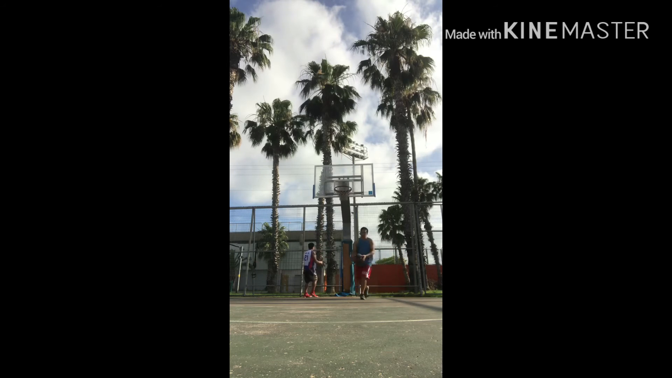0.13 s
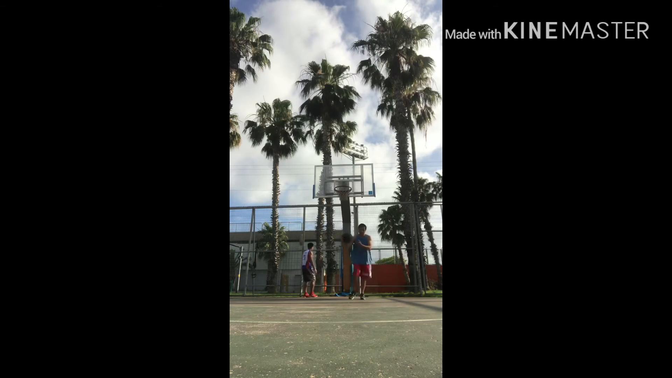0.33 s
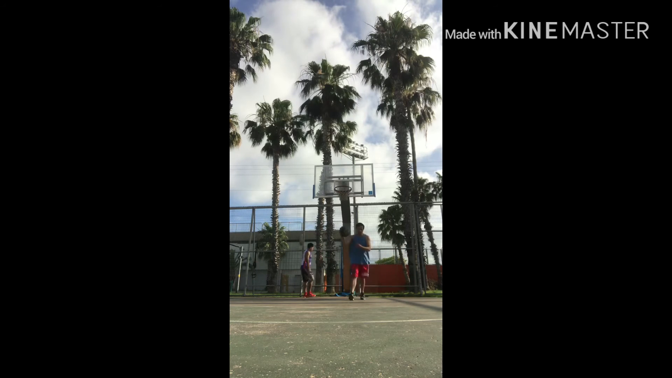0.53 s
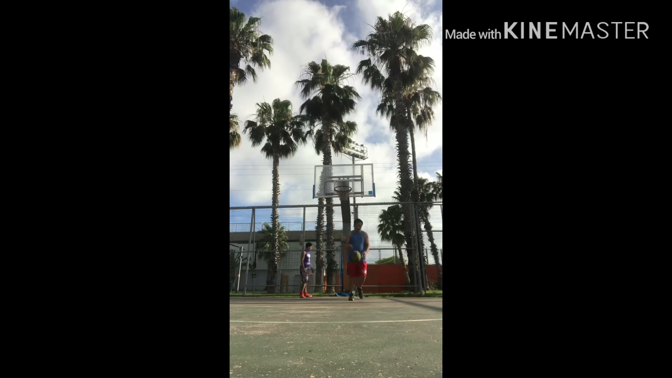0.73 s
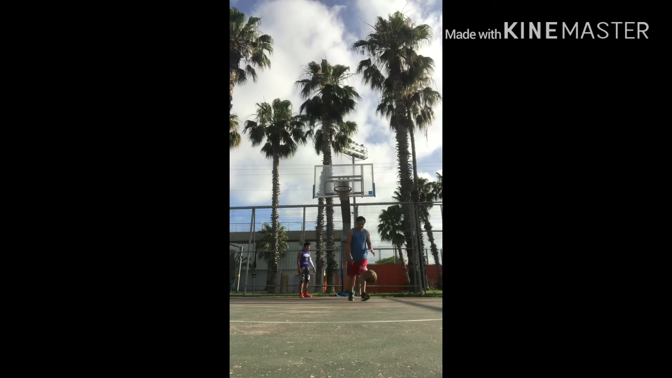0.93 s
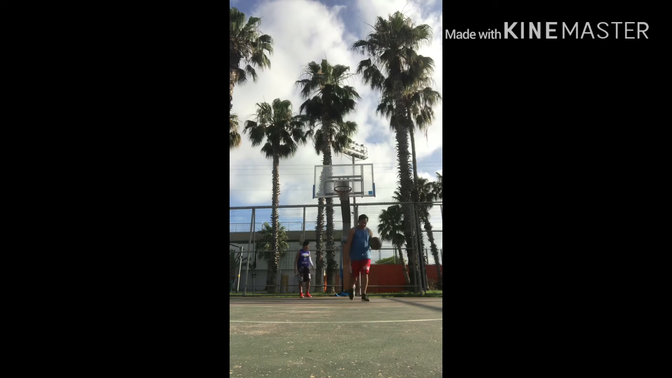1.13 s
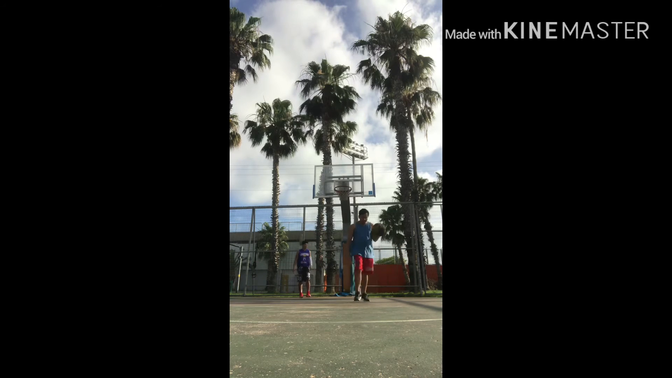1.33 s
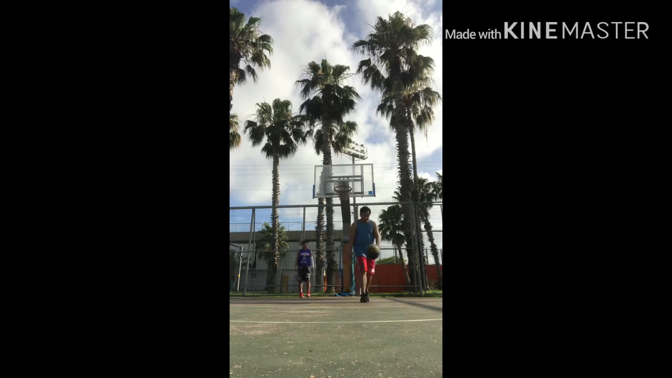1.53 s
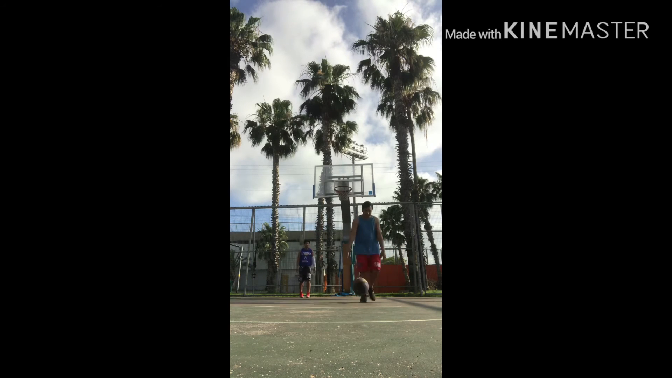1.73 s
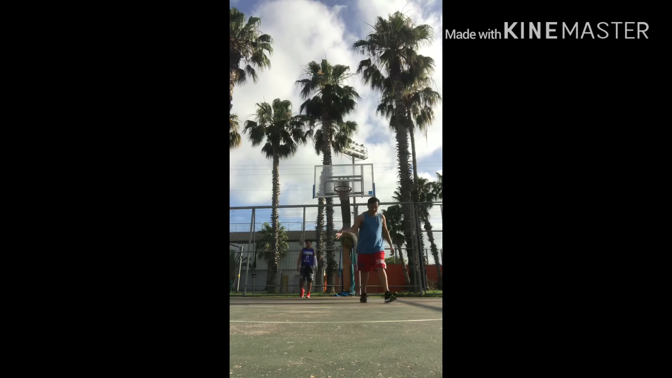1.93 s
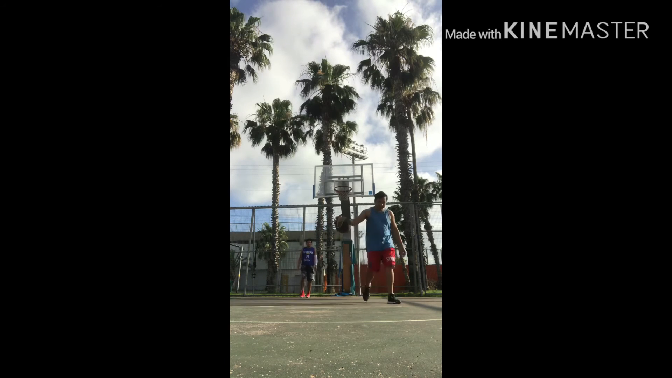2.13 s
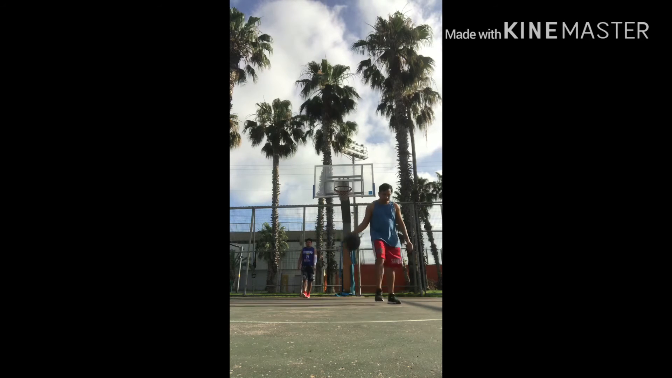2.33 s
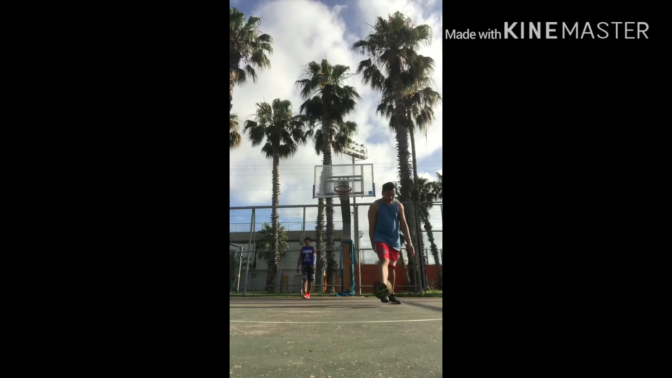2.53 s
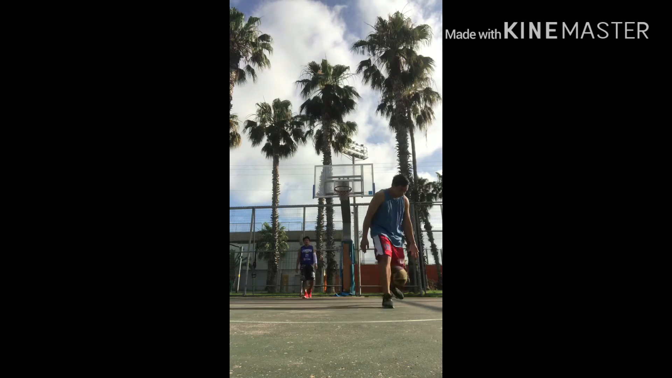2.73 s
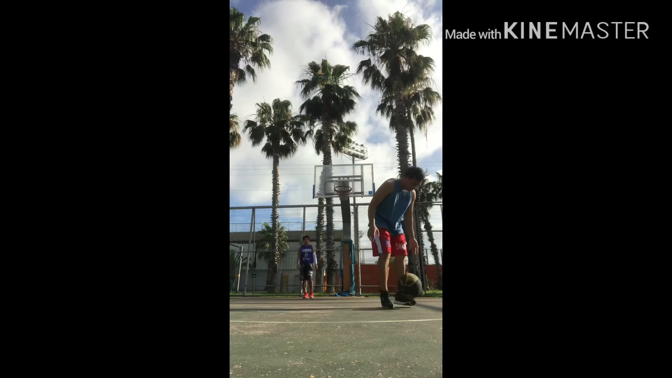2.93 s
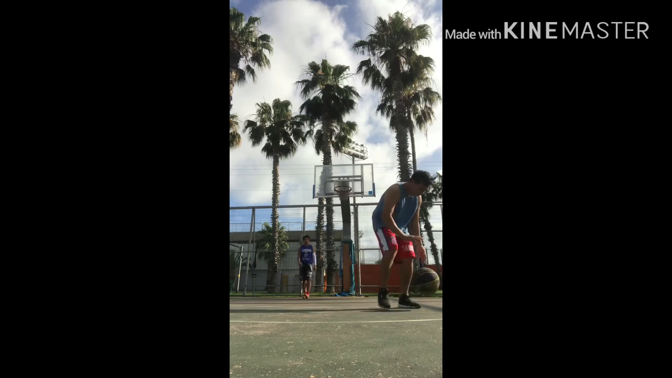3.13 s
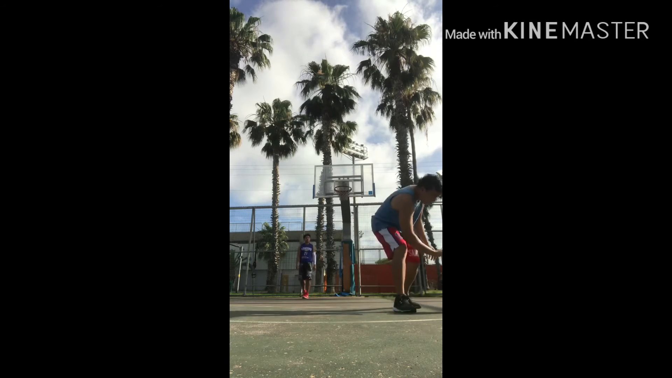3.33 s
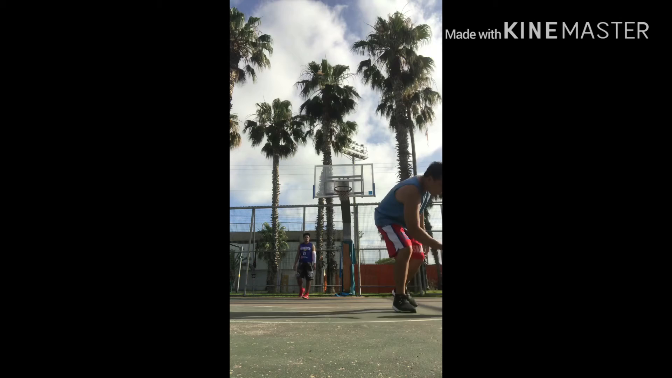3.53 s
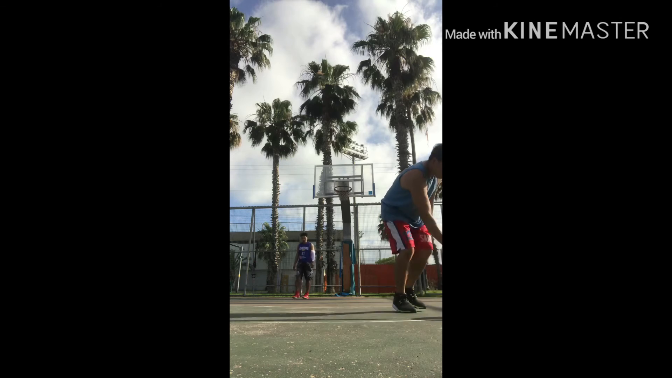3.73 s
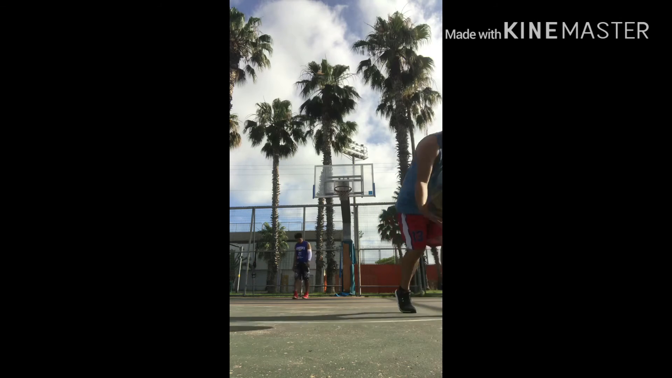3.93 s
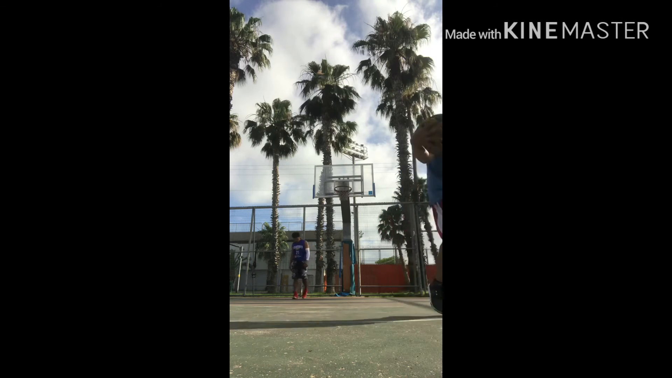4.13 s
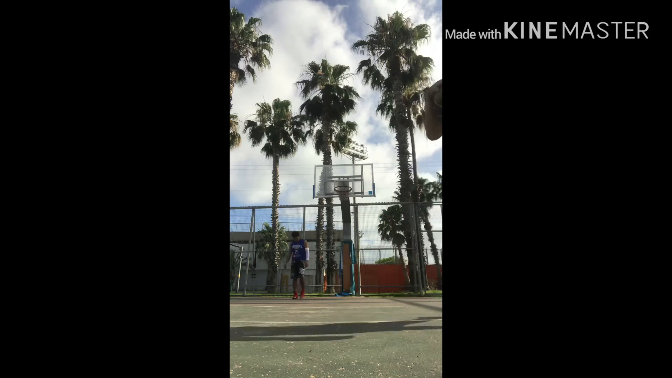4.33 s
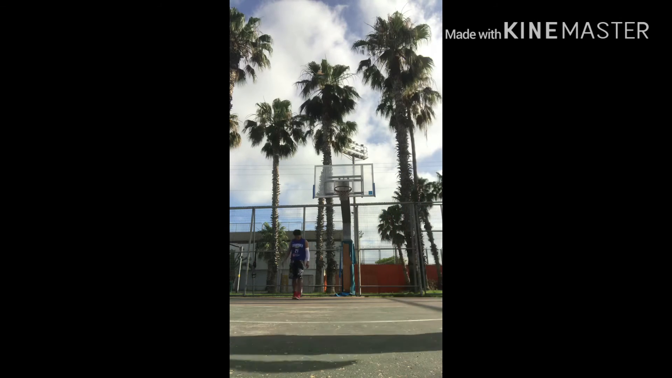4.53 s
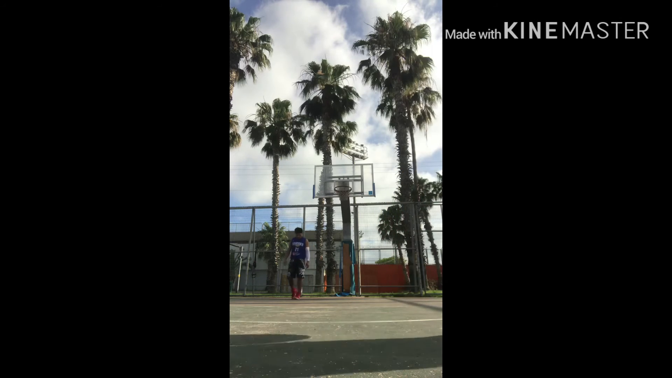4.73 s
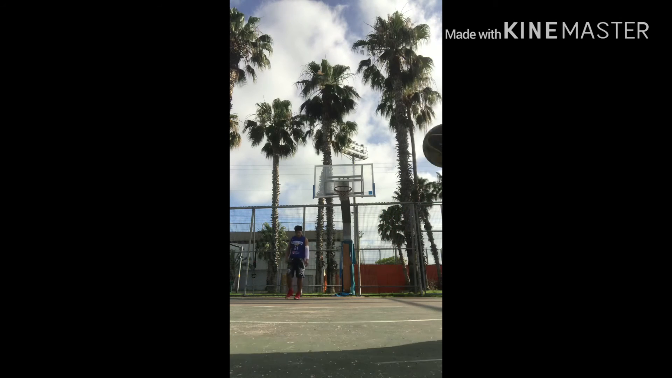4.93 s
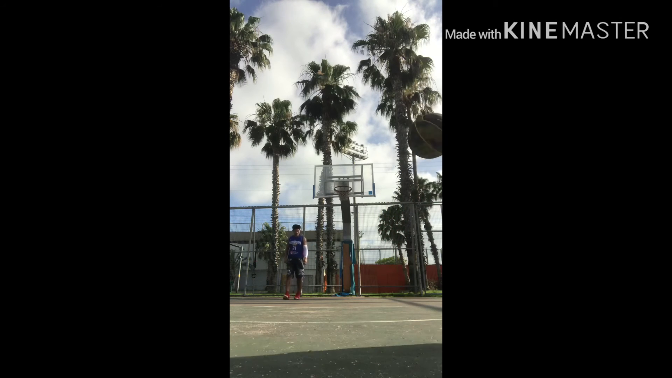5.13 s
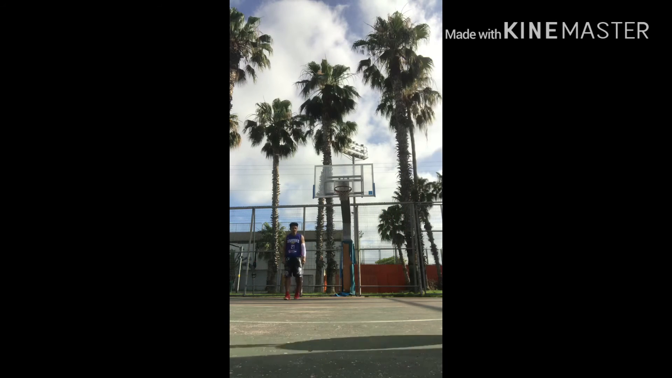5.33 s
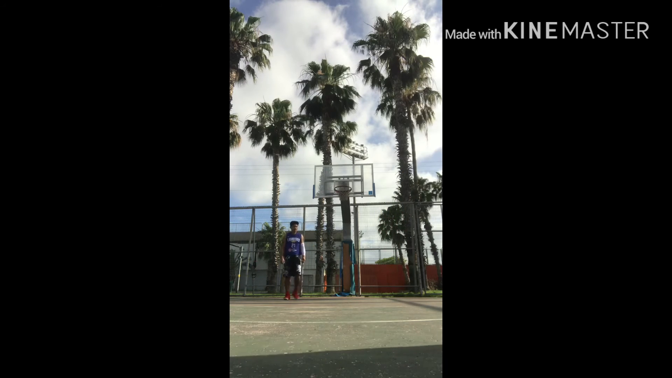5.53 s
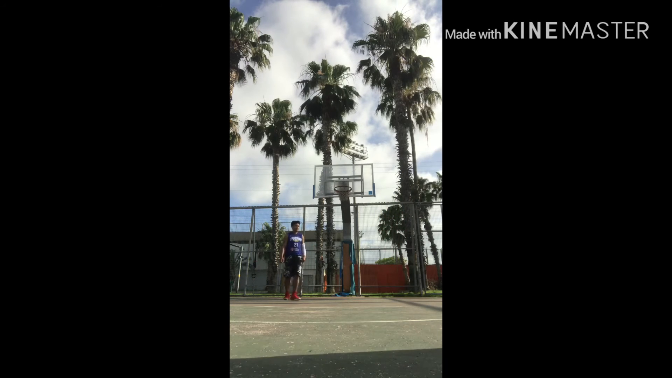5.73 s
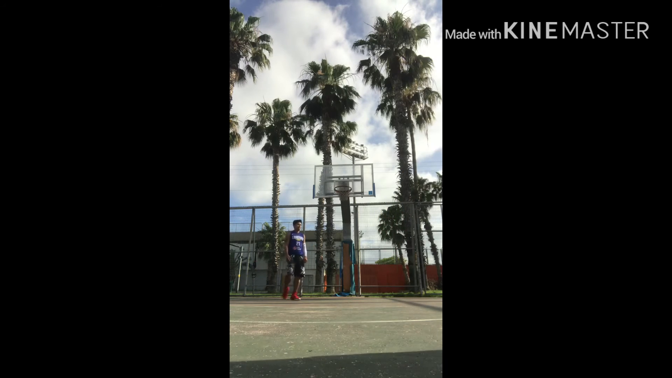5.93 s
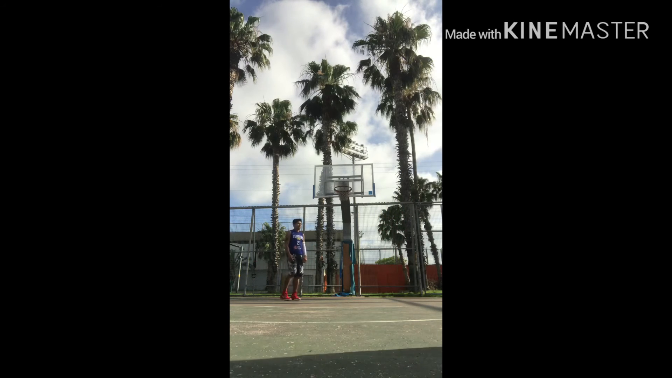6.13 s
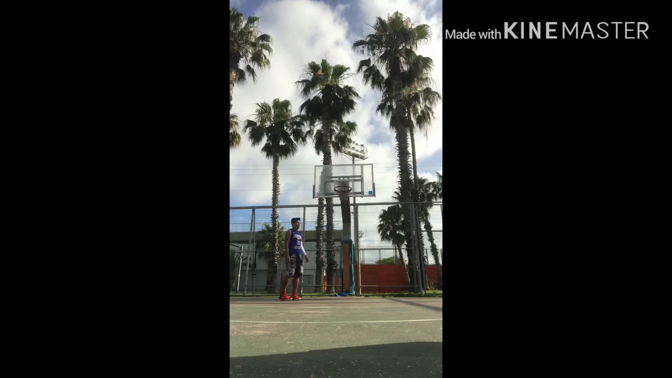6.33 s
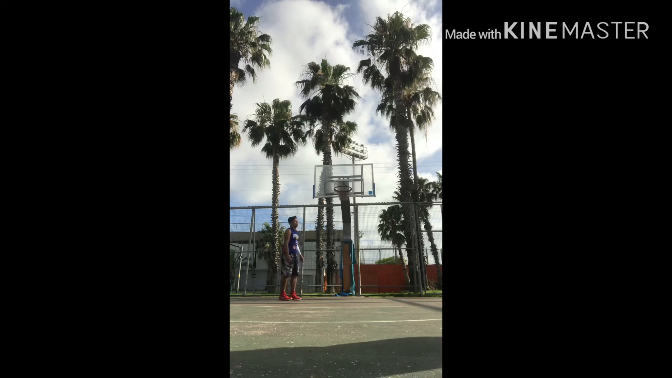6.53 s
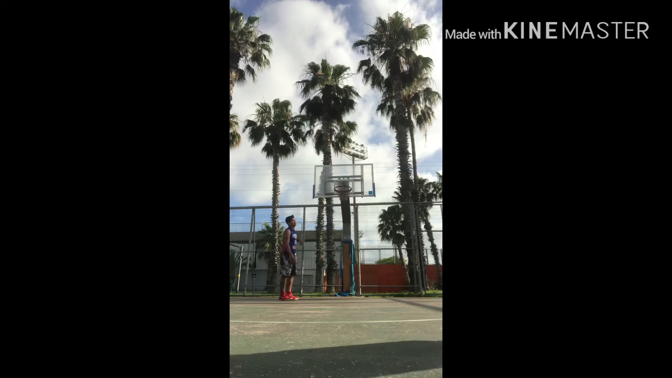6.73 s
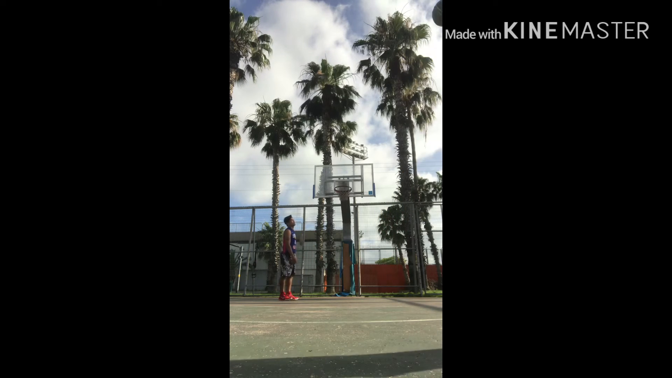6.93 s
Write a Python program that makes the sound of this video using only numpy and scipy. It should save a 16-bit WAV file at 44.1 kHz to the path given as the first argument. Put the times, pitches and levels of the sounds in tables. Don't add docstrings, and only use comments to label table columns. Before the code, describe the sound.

A basketball is dribbled on open concrete, irregular slapping thumps growing louder and closer, with gritty shoe scuffs over low town rumble and faint hiss.

```python
import sys
import numpy as np
from scipy import signal
from scipy.fft import rfft, irfft
from scipy.io import wavfile
from scipy.ndimage import uniform_filter1d

SR = 44100
rng = np.random.default_rng(int(sys.argv[2]) if len(sys.argv) > 2 else 0)


def level_to_linear(level):
    exponent = np.asarray(level, float) / 20
    return 10 ** exponent


def log_audio(samples):
    frames = np.atleast_2d(samples).T
    limited = np.clip(frames, -1, 1)
    pcm = np.round(limited * 32767).astype(np.int16)
    wavfile.write(sys.argv[1], SR, pcm)


N = 308700
BOUNCE_N = 12000
CONTACT_S = .0148


def evened(x):
    return x / np.sqrt(np.mean(x ** 2) + 1e-20)


def read(points, hz):
    f, value = np.transpose(points)
    return np.interp(np.log(hz + 1), np.log(f + 1), value)


def add(mix, start_s, sound):
    part = mix[round(start_s * SR):][:len(sound)]
    part += sound[:len(part)]


def tinted(spectrum, size):
    z = rfft(rng.standard_normal(size))
    hz = np.fft.rfftfreq(size, 1 / SR)
    return evened(irfft(z * level_to_linear(read(spectrum, hz)), size))


def ring(t, hz, db, t60, rise=0.00013):
    t = np.maximum(t, 0)
    return level_to_linear(db - 60 * t / t60) * (1 - np.exp(-t / rise)) * np.sin(2 * np.pi * hz * t)


def thump(t, thump_db, contact):
    u = t * CONTACT_S / contact
    half_turns = 1.3 * np.log(u / .0009 + .1) + 2 * 37 * (u - .001)
    hold = np.minimum(t / .0014, 1) ** 2 * level_to_linear(-950 * np.maximum(u - .0155, 0))
    lift = (contact - t) / .0022
    suction = .8 * lift * np.exp(-lift ** 2)
    return level_to_linear(thump_db) * (hold * np.cos(np.pi * half_turns) + suction)


# frequency_hz [Hz], level_db [dB]
SLAP_SPECTRUM = [(1760, -21), (3000, -8.5), (4300, -7.5), (4940, -9), (6760, -7), (7860, -13.5),
                 (9060, -14.5), (12300, -27), (16500, -45)]


def slap(t, thump_db, slap_db):
    decay = level_to_linear(-18.0 - 60 * t / 0.0052) + level_to_linear(-27.0 - 60 * t / 0.017)
    fizz = rng.standard_normal(len(t)) * decay * (t > .0004)
    fizz[16] -= 1
    hz = np.fft.rfftfreq(len(t), 1 / SR)
    top_db = 0.54 * (slap_db - thump_db)
    colour = level_to_linear(read(SLAP_SPECTRUM, hz) + top_db * np.log2(hz / 6000 + .01))
    return level_to_linear(slap_db) * irfft(rfft(fizz) * colour / colour.mean(), len(t)) * (t < .1)


# pitch_factor [ratio to skin pitch], level_db [dB], t60_s [s]
SKIN_MODES = [(.33, -11, 0.043), (.68, -4, 0.033), (1.0, 6.5, 0.02), (1.3, 6, 0.01)]
# pitch_hz [Hz], level_db [dB], t60_s [s]
UPPER_MODES = [(1535, -6, 0.02), (1900, 9.5, 0.006), (2260, 8, 0.0085), (2680, -6, 0.011)]


def struck_modes(t, lag, strike_db, skin_hz, skin_db, cavity_db, upper_db):
    detune = 1 + 0.047 * rng.standard_normal(8)
    body = np.zeros(len(t))
    for (factor, db, t60), d in zip(SKIN_MODES, detune):
        body += ring(t - lag, skin_hz * factor * d, skin_db + strike_db + db, t60, rise=0.00069)
    cavity_hz = 1047 * (1 + strike_db / 100)
    body += ring(t - lag - .0004, cavity_hz, cavity_db + 0.64 * strike_db, 0.02, rise=0.001)
    for (hz, db, t60), d in zip(UPPER_MODES, detune[4:]):
        body -= ring(t - .0002, hz * d, upper_db + 2.2 * strike_db + db, t60, rise=0.00023)
    return body


# pitch_hz [Hz], level_db [dB re skin], t60_s [s]
AIR_MODES = [(975, -26, .17), (600, -28, .12)]


def inner_air(t, skin_db):
    return sum(ring(t, hz, skin_db + db, t60, rise=0.0073) for hz, db, t60 in AIR_MODES)


# frequency_hz [Hz], level_db [dB]
WOBBLE_SPECTRUM = [(150, -24), (280, 10), (480, 8), (700, -3), (1000, -9), (1600, -4), (2400, -26),
                   (3500, -47)]


def wobble(t, skin_db):
    return tinted(WOBBLE_SPECTRUM, len(t)) * level_to_linear(skin_db - 5.5 - 60 * t / 0.093) * (1 - np.exp(-t / 0.0014))


# frequency_hz [Hz], level_db [dB]
PEEL_SPECTRUM = [(700, -18), (1300, -8), (1700, -8.5), (2400, 2), (3200, -13)]


def peel(t, upper_db, contact):
    return tinted(PEEL_SPECTRUM, len(t)) * level_to_linear(upper_db - 23 - 60 * np.maximum(t - contact, 0) / 0.055)


def bounce(thump_db, slap_db, cavity_db, skin_hz):
    t = np.arange(BOUNCE_N) / SR
    skin_db = 2 + 1.242 * thump_db
    upper_db = -12 + 0.61 * slap_db
    contact = CONTACT_S * level_to_linear(-.03 * (thump_db + 14.0))
    body = thump(t, thump_db, contact) + wobble(t, skin_db) + peel(t, upper_db, contact)
    body += inner_air(t, skin_db)
    levels = (skin_hz, skin_db, cavity_db, upper_db)
    body += struck_modes(t, .0022, 0, *levels)
    body += struck_modes(t - contact, .0001, -7.5, *levels)
    top_fade = signal.butter(4, 3000, fs=SR, output="sos")
    return signal.sosfilt(top_fade, body) + slap(t, thump_db, slap_db)


# [Hz, skin]
BOUNCES = [
    (1.073, -21, -25.5, -22, 628),
    (1.877, -19, -25.5, -22, 540),
    (2.6962, -24.5, -22.5, -26.5, 464),
    (3.38, -37.5, -43, -30, 584),
    (3.6081, -28, -36.5, -32, 440),
    (3.881, -16, -19.5, -27, 625),
    (4.7769, -12.5, -10, -22, 685),
    (5.4647, -11, -14.5, -29, 540),
]


def dribble(near):
    for start_s, *row in BOUNCES:
        add(near, start_s, bounce(*row))


def palm(db):
    t = np.arange(6000) / SR
    click = tinted([(1000, -17), (2200, 17), (4000, -34), (9000, -29), (14000, -46)], size=6000)
    return click * level_to_linear(db - 60 * t / 0.033) * (1 - np.exp(-t / 0.00065))


def thud(db, hz, t60, rattle):
    t = np.arange(6000) / SR
    share, mid = np.clip(rattle, 0, 1), abs(hz)
    body = [(mid / 4, -30), (mid * 0.18, 0), (mid * 1.76, -3), (mid * 4, -20), (mid * 8, -60)]
    loose = tinted(body, size=6000) * level_to_linear(db - 60 * t / (1.4 * t60)) * (1 - np.exp(-t / 0.00074))
    return (1 - share) * 2 * ring(t, hz, db, t60, rise=0.0004) + share * loose


# start_s [s], level_db [dB], pitch_hz [Hz, minus for a pull first], t60_s [s], rattle [share 0-1]
THUDS = [(.097, -33, 525, 0.051, 0.53), (2.799, -34, 494, 0.051, 0.85), (2.802, -32, 132, 0.024, 0),
         (3.0255, -35.5, 902, 0.061, 0.7), (3.032, -16, -150, 0.02, 0.47),
         (3.557, -14.5, 339, 0.0068, 0.08), (3.5584, -31.5, 950, 0.013, 0.2),
         (3.563, -24.5, 456, 0.02, 0.3), (3.6238, -31, 478, 0.05, 0.77), (3.79, -31.5, 297, 0.052, 0.63),
         (3.798, -25.5, 400, 0.032, 0.5), (4.894, -26.5, 398, 0.016, 0.5), (5.254, -34, 198, 0.014, 0.6),
         (5.699, -37, 413, 0.06, 0.52)]


def footwork(near):
    for start_s, *row in THUDS:
        add(near, start_s, thud(*row))


# frequency_hz [Hz], level_db [dB]
GRIT_SPECTRUM = [(1500, -32), (3000, 2), (5000, 7.5), (9500, -6), (12000, -24.5), (16000, -25)]


def scuff(length, db):
    crunch_db = evened(uniform_filter1d(rng.standard_normal(4096), 60))
    noise = tinted(GRIT_SPECTRUM, size=4096) * level_to_linear(crunch_db)
    u = np.clip(np.arange(4096) / SR / length, 0, 1)
    return level_to_linear(db) * noise * np.sqrt(np.sin(np.pi * u ** 0.64).clip(0))


# start_s [s], length_s [s], level_db [dB]
SCUFFS = [(2.207, .02, -68), (2.596, 0.012, -68), (2.788, .03, -68), (3.372, 0.028, -55),
          (3.551, 0.0035, -58), (3.788, .02, -65), (4.063, .04, -64), (4.98, .02, -74), (5.78, .07, -65),
          (6.282, .06, -66)]


def dragged_soles(near):
    for start_s, *row in SCUFFS:
        add(near, start_s, scuff(*row))


# delay_s [s], level_db [dB]
ECHOES = [
    (.052, -32),
    (0.069, -47.5),
    (.116, -58),
]


def echoed(near):
    bright, mix = near - uniform_filter1d(near, 150), near.copy()
    for delay_s, db in ECHOES:
        add(mix, delay_s, level_to_linear(db) * bright)
    return mix


# frequency_hz [Hz], level_db [dB per Hz]
TOWN_SPECTRUM = [(15, -40), (25, -3), (37, -7.5), (56, -1), (80, -6.5), (149, -12.5), (180, -13),
                 (228, -14.5), (264, -17), (412, -18.5), (567, -14.5), (747, -21), (1510, -24), (2450, -18),
                 (4000, -38.5), (5200, -53.5), (8800, -120)]
# frequency_hz [Hz], level_db [dB per Hz]
HISS_SPECTRUM = [(2350, -22.5), (4000, -5.5), (4890, -8), (6310, -6.5), (7590, -14), (9170, -15),
                 (10500, -21.5), (15100, -22.5), (16000, -39), (16500, -45.5)]
# time_s [s], level_db [dB]
TRAFFIC = [(0.0, -47), (0.62, -46.5), (1.46, -47.5), (2.48, -46.5), (2.61, -46), (4.0, -48), (4.72, -47.5),
           (5.24, -49), (5.57, -48.5), (7.0, -47)]


def town():
    frames = N // 256 + 5
    a, b, patches = rng.standard_normal((frames, 513, 3)).T
    patches = evened(uniform_filter1d(uniform_filter1d(patches, 10, 0), 12, 1))
    grain = (a + 1j * b) * level_to_linear(0.55 * patches)
    wide = signal.istft(grain, nperseg=1024, noverlap=768)[1][:N]
    z, hz = rfft(wide), np.fft.rfftfreq(N, 1 / SR)
    low = 1 / (1 + (hz / 200) ** 4)
    colour = level_to_linear(read(TOWN_SPECTRUM, hz))
    level_db = np.interp(np.arange(N) / SR, *np.transpose(TRAFFIC))
    rumble = evened(irfft(z * colour * low, N)) * level_to_linear(level_db + 1.5)
    wash_db = -47 + 0.088 * (level_db - level_db.mean())
    wash = evened(irfft(z * colour * (1 - low), N)) * level_to_linear(wash_db)
    hiss = level_to_linear(-66.5) * evened(irfft(z * level_to_linear(read(HISS_SPECTRUM, hz)), N))
    return rumble + wash + hiss


def scene():
    near = np.zeros(N)
    dribble(near)
    add(near, 3.0255, palm(-35))
    footwork(near)
    dragged_soles(near)
    return (echoed(near) + town())[None]


def low_pass(x):
    return signal.sosfilt(signal.butter(12, 16640, fs=SR, output="sos"), x)


def record(dry):
    bass_cut = signal.butter(3, 33, "highpass", fs=SR, output="sos")
    top_cut = signal.firwin(511, 16500, window=("kaiser", 9), fs=SR)
    mix = signal.sosfiltfilt(bass_cut, dry)
    mix = signal.oaconvolve(mix, top_cut[None], "same")
    return low_pass(mix)


dry = scene()
out = record(dry)
log_audio(out)
```